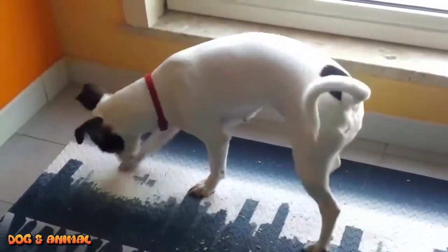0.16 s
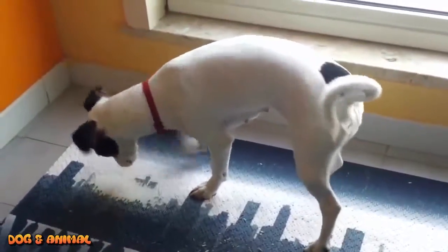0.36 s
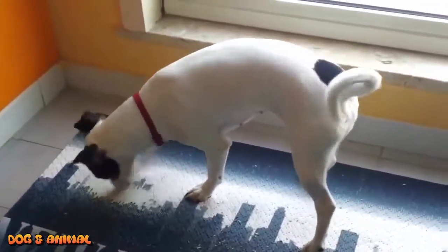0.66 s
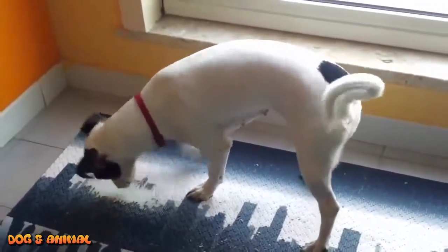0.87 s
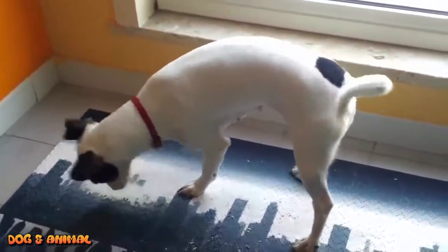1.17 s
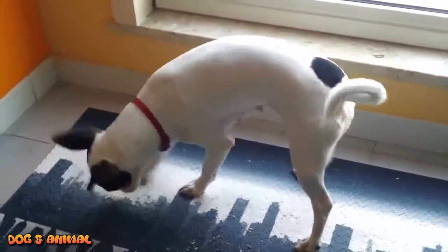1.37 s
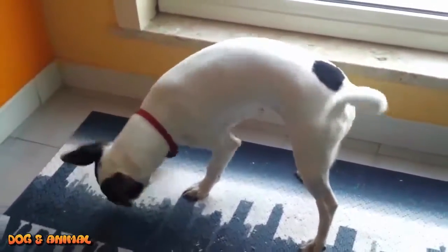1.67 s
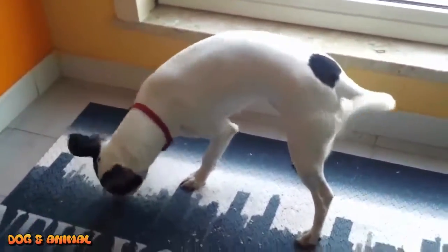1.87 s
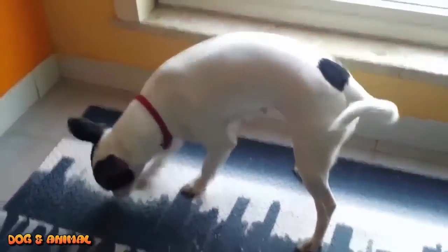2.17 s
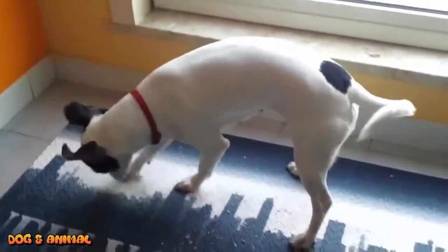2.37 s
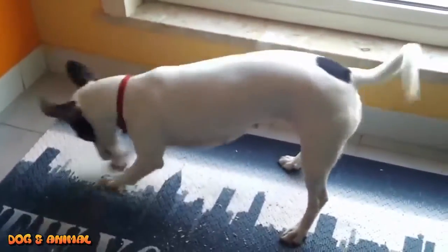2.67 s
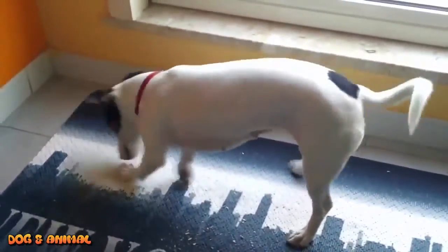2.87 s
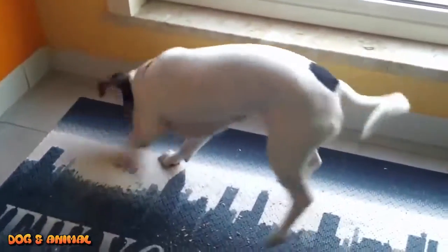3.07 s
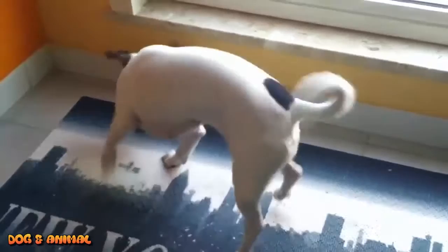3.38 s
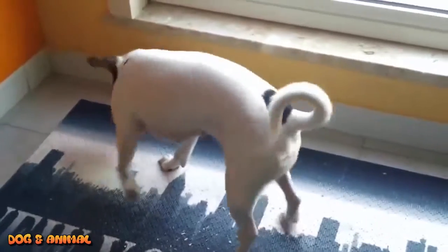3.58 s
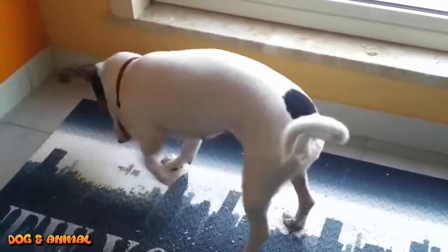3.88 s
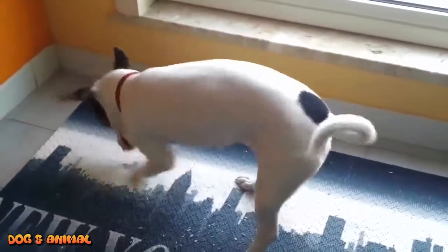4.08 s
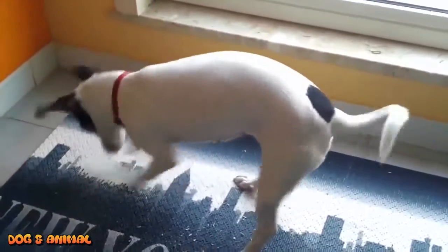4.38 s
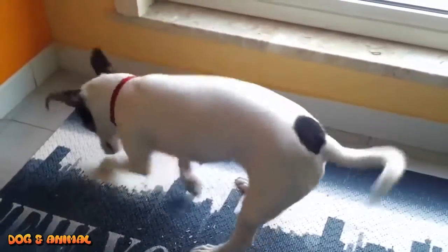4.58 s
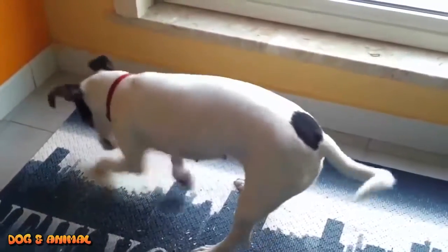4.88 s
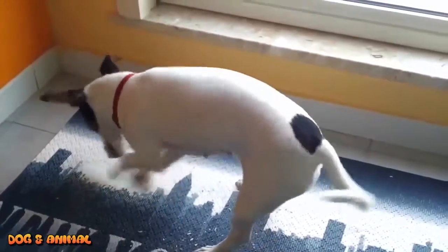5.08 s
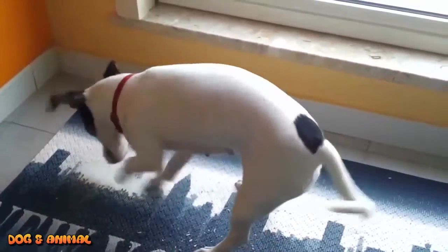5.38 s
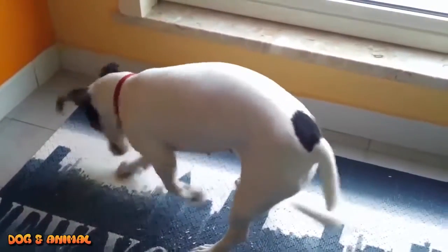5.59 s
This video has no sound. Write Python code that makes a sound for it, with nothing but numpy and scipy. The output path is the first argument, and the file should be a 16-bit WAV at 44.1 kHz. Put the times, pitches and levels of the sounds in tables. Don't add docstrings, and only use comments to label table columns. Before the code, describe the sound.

Claws drag through dense, stiff bristles and tear free with crisp crackling bursts. Strong, regular strokes come first, the mat's rubber underside ringing and slapping the tiles; then a looser patch of ticks, shuffles and one tiny nose whistle; finally both paws scrabble quickly. A phone at two metres hears it in a small, hard, lively room, with thinned quiet detail and little deep bass.

```python
import sys
import numpy as np
from scipy import signal
from scipy.fft import rfft, irfft
from scipy.io import wavfile
from scipy.ndimage import uniform_filter1d

SR = 44100
rng = np.random.default_rng(int(sys.argv[2]) if len(sys.argv) > 2 else 0)


def digitize_waveform(pressure):
    field = np.atleast_2d(pressure).T
    bounded = np.clip(field, -1, 1)
    quanta = np.round(bounded * 32767).astype(np.int16)
    wavfile.write(sys.argv[1], SR, quanta)


def voltage_ratio(level):
    return 10 ** (np.asarray(level, float) / 20)


N = 253218
T = np.arange(N) / SR

# (frequency [Hz], density [dB per Hz])
BRISTLE_TONE = [(1470, -27.5), (2500, -14), (3110, -10.5), (4100, -9.5), (5290, -0.5), (5790, 0),
                (6330, -3.5), (7580, 0.5), (10100, -16), (11200, -16), (12800, -18.5), (13900, -18),
                (15000, -19)]
# (lift time [s], drag length [s], touch level [dB], lift level [dB], backing level [dB])
PAWS_IN_TURN = [(4.438, 0.065, -40, -25, -34.5), (4.564, 0.074, -27, -28, -47),
                (4.714, 0.083, -30, -27, -47.5), (4.788, 0.021, -32, -27.5, -41.5),
                (4.853, 0.024, -30, -31, -44.5), (4.998, 0.074, -29.5, -30.5, -49),
                (5.098, 0.051, -42, -30, -43.5), (5.143, 0.043, -36, -35.5, -46),
                (5.283, 0.091, -31, -30, -47.5), (5.381, 0.048, -35, -29.5, -43.5),
                (5.43, 0.021, -38, -40.5, -49), (5.56, 0.071, -28, -33.5, -60.5),
                (5.595, 0.025, -33, -46.5, -55.5), (5.714, 0.078, -28.5, -31, -46)]


def unit(x):
    return x / np.sqrt(np.mean(x ** 2))


def colour(table, size=1024):
    hz, db = np.transpose(table)
    f = np.maximum(np.arange(size + 1) * SR / 2 / size, 1)
    gain_db = np.interp(np.log(f), np.log(hz), db, left=db[0] - 20, right=db[-1] - 20)
    cepstrum = irfft(np.log(voltage_ratio(gain_db)))
    cepstrum[1:size] *= 2
    cepstrum[size + 1:] = 0
    h = irfft(np.exp(rfft(cepstrum)))[:size]
    return h / np.sqrt(np.sum(h ** 2))


def through(x, h):
    return signal.fftconvolve(x, h)[:N]


def ring(x, hz, width):
    return signal.lfilter(*signal.iirpeak(hz, hz / max(width, 10), SR), x)


def flicks(rate, spread_db):
    luck = rng.random(N)
    sign = rng.choice([-1, 1], N)
    size_db = spread_db * np.minimum(rng.exponential(size=N), 5.5)
    return unit((luck < rate / SR) * sign * voltage_ratio(size_db))


def shape(start_s, end_s, start_db, end_db, rise, fall):
    level_db = np.interp(T, [start_s, end_s], [start_db, end_db])
    return level_db - rise * np.maximum(start_s - T, 0) - fall * np.maximum(T - end_s, 0)


def room(x, wet_db, gap_s):
    # (frequency [Hz], decay time to -60 dB [s])
    decay_times = [(250, 0.83), (1000, 0.16), (2700, 0.31), (7000, 0.31), (14000, 0.84)]
    t = np.arange(SR // 2) / SR
    hz, t60 = np.transpose(decay_times)
    f = np.arange(len(t) // 2 + 1) * SR / len(t)
    noise = rfft(rng.standard_normal(len(t)))
    tail = 0
    for k in range(len(hz)):
        share = np.interp(np.log(f + 1), np.log(hz), np.arange(len(hz)) == k)
        tail = tail + irfft(noise * share, len(t)) * voltage_ratio(-60 * t / t60[k])
    tail = tail * np.clip(t / gap_s, 0, 1) ** 2
    return x + voltage_ratio(wet_db) * through(x, tail / np.sqrt(np.sum(tail ** 2)))


def air():
    # (frequency [Hz], density [dB per Hz])
    air_tone = [(25, -8.5), (100, -6.5), (220, -2), (500, -3.5), (1400, -7), (2500, -12.5), (6000, -4),
                (9500, -24), (15500, -29)]
    return voltage_ratio(-55.5) * through(rng.standard_normal(N), colour(air_tone, size=4096))


def whistle():
    # (time [s], frequency [Hz], level [dB])
    glide = [
        (3.17, 9400, -80),
        (3.2, 9900, -57),
        (3.24, 10500, -67),
        (3.28, 10500, -73),
        (3.36, 11100, -80),
    ]
    s, pitch, level = np.transpose(glide)
    hz = np.interp(T, s, pitch)
    db = np.interp(T, s, level)
    return voltage_ratio(db) * (T > s[0]) * (T < s[-1]) * np.sin(2 * np.pi * np.cumsum(hz) / SR)


def paws():
    # (time [s], held [s], thud level [dB], shuffle level [dB])
    steps = [(.13, 0.016, -61.5, -58), (0.402, 0.051, -46.5, -52), (.715, 0.012, -42, -46.5),
             (0.992, 0.034, -45, -47.5), (1.271, 0.039, -44, -46.5), (1.53, 0.024, -51, -80),
             (1.811, 0.047, -50, -50.5), (2.085, 0.019, -50.5, -50), (2.367, 0.036, -47.5, -49.5),
             (2.679, 0.013, -46.5, -44), (2.94, 0.089, -52.5, -64), (3.11, 0.06, -54, -55.5),
             (3.39, 0.015, -52, -50.5), (3.671, 0.043, -46.5, -49.5), (3.901, 0.078, -47, -54.5),
             (4.19, 0.064, -48, -55), (4.419, 0.013, -49.5, -49.5), (4.56, 0.014, -54.5, -55),
             (4.641, 0.05, -51, -72), (4.77, 0.038, -60, -102), (4.89, 0.082, -58, -73),
             (4.996, 0.015, -64, -55.5), (5.1, 0.18, -60.5, -68), (5.241, 0.021, -55.5, -76),
             (5.341, 0.1, -59, -69.5), (5.55, 0.02, -51.5, -57), (5.679, 0.034, -48.5, -51.5)]
    # (frequency [Hz], density [dB per Hz])
    thud_tone = [(76, -24.5), (130, -13), (210, -2), (247, -8), (280, -0.5), (373, -2), (420, -12.5),
                 (500, -30), (650, -58), (1100, -120)]
    # (frequency [Hz], width [Hz], level [dB])
    floor_notes = [(223, 13.6, 1.5), (276.3, 19.4, -2)]
    land, thud_fall, shuffle_fall = 530, 301, 594
    weight, slide = voltage_ratio(-72), 0
    for s, held, thud_db, shuffle_db in steps:
        weight = weight + voltage_ratio(shape(s, s + held, thud_db, thud_db, land, thud_fall))
        slide = slide + voltage_ratio(shape(s, s + held, shuffle_db, shuffle_db, land, shuffle_fall))
    thud = through(flicks(3000, 1.0), colour(thud_tone, size=4096))
    thud = unit(1.2 * thud + sum(voltage_ratio(db) * ring(thud, hz, w) for hz, w, db in floor_notes))
    shuffle = unit(ring(ring(flicks(3000, 0.43), 682, 217), 573, 240))
    return weight * thud + slide * shuffle


def slaps():
    # (time [s], peak level [dB], frequency [Hz])
    slap_hits = [(0.4286, -42, 2880), (0.726, -32, 2690), (1.015, -25.5, 2630), (1.2948, -21.5, 2676),
                 (1.5741, -21, 2603), (1.8467, -26, 2636), (2.1116, -28, 3010), (2.395, -21.5, 2543),
                 (2.7032, -29.5, 2900), (4.2534, -30.5, 2460), (4.7072, -36, 3230), (5.5736, -26.5, 2420),
                 (5.6996, -27, 2140)]
    out = np.zeros(N)
    t = np.arange(4096) / SR
    for s, peak_db, hz in slap_hits:
        push = rng.standard_normal(len(t)) * np.exp(-t / 0.011)
        note = ring(push, hz, 190)
        i = int(s * SR)
        out[i:i + len(t)] += (voltage_ratio(peak_db + 1.5) * note / np.max(abs(note)))[:N - i]
    return out


def backing(x):
    # (frequency [Hz], density [dB per Hz])
    sheet_tone = [(470, -64), (800, -1), (1280, 4.5), (2060, -0.5), (2640, -1.5), (2900, -6.5), (3730, -4),
                  (4190, -8.5), (4500, 3.5), (5850, -64.5), (9900, -120)]
    # (frequency [Hz], width [Hz], level [dB])
    sheet_modes = [(1403, 60, -13), (1710, 178, 5), (1908, 6.3, -57), (2620, 6.6, -48), (2630, 79, -4),
                   (3015, 21.7, 15), (3576, 305, 3)]
    kick = np.arange(4096) == 0
    modes = 0
    for k, (hz, width, db) in enumerate(sheet_modes):
        modes = modes + (-1) ** k * voltage_ratio(db) * ring(kick, hz, 1.7 * width)
    h = np.convolve(kick + voltage_ratio(2.5) * modes, colour(sheet_tone))
    return through(x, h / np.sqrt(np.sum(h ** 2)))


def drags():
    # (lift time [s], drag length [s], touch level [dB], lift level [dB], backing level [dB])
    single_paw = [(0.046, 0.043, -44, -39, -85), (0.134, 0.05, -40, -30, -43),
                  (.42, 0.058, -48.5, -33, -35), (0.458, 0.036, -28.5, -24, -34.5),
                  (0.733, 0.059, -31.5, -24, -32), (1.018, 0.087, -47.5, -29, -31.5),
                  (1.293, 0.073, -45.5, -27.5, -31), (1.574, 0.081, -47.5, -29.5, -34.5),
                  (1.843, 0.054, -40, -25, -30.5), (2.103, 0.07, -49.5, -26, -30.5),
                  (2.36, .06, -40.5, -36, -73), (2.395, 0.027, -34, -31.5, -44),
                  (2.655, 0.071, -42, -36, -56), (2.71, 0.016, -22.5, -36.5, -53),
                  (2.871, 0.08, -45, -43, -53), (3.062, 0.15, -31.5, -34, -54),
                  (3.153, 0.063, -37.5, -30, -40), (3.36, 0.039, -45.5, -48.5, -55.5),
                  (3.445, 0.066, -32.5, -31.5, -43.5), (3.62, 0.039, -45.5, -62, -77),
                  (3.708, 0.085, -40, -26.5, -35.5), (3.987, 0.11, -41.5, -26, -35.5),
                  (4.285, .11, -32.5, -30, -43.5)]
    land, lift, settle, sheet_fall = 913, 688, 137, 712
    late_s = 0.002
    pile, sheet = 0, 0
    for s, drag, touch_db, lift_db, back_db in single_paw + PAWS_IN_TURN:
        start = s - max(drag, .005)
        pile = pile + voltage_ratio(2 * shape(start, s, touch_db, lift_db, land, lift))
        settle_db = lift_db - 18
        pile = pile + voltage_ratio(2 * shape(s, s + .001, settle_db, settle_db, land, settle))
        low_db = back_db + 1.435 * (touch_db - lift_db)
        sheet = sheet + voltage_ratio(2 * shape(start + late_s, s + late_s, low_db, back_db, land, sheet_fall))
    return np.sqrt(pile), np.sqrt(sheet)


def grit():
    k = int(SR / 109.24)
    steps_db = np.repeat(rng.standard_normal(N // 100), k)[:N]
    return voltage_ratio(2 * unit(uniform_filter1d(steps_db, k)))


def scrape(pile):
    return through(pile * grit() * flicks(9000, 1.4), colour(BRISTLE_TONE))


def releases():
    # (time [s], peak [dB], backing over peak [dB], frequency [Hz])
    tears = [(.1186, -16.5, -15, 6260), (.4266, -18, -4, 5900), (.7117, -9.5, -10, 5240),
             (1.0034, -7.5, -20, 5080), (1.2805, -10.5, -8, 5200), (1.5603, -11, -19, 5030),
             (1.8341, -12.5, -15, 6900), (2.096, -14.5, -45, 6500), (2.3809, -11, -6.5, 5200),
             (2.691, -14, -5, 5460), (3.1477, -19.5, -44, 6300), (3.4325, -13.5, -33, 4850),
             (3.704, -13.5, -31, 5930), (3.9759, -10, -27, 6200), (4.2676, -13.5, -43, 8250),
             (4.4251, -16, -26, 5170), (4.5532, -20, -7.5, 5570), (4.6997, -15.5, -12.5, 6550),
             (4.8344, -17, -26, 6100), (4.9833, -19, -34, 6440), (5.1297, -18, -27, 5900),
             (5.2677, -17.5, -10, 6000), (5.4179, -19, -14, 5950), (5.5633, -25, -2, 5960),
             (5.696, -17, -6, 5300)]
    # (time [s], peak [dB], backing over peak [dB])
    slips = [(0.6839, -23.5, -2), (0.9823, -22, 1.5), (0.9952, -17, -3), (1.266, -20.5, 1),
             (1.548, -20, -0.5), (1.819, -22.5, 2), (2.0811, -28, 2.5), (2.369, -19, -5),
             (2.373, -17.5, 1.5), (3.3928, -23, -12), (3.4058, -25, -28), (3.4398, -20, -15),
             (3.898, -22.5, -9)]
    # (time [s], peak [dB])
    touches = [(0.2937, -43.5), (2.3022, -32.5), (2.9053, -54), (3.6452, -29), (4.1747, -35), (4.3852, -25),
               (4.487, -29), (4.6159, -26.5), (4.7638, -23), (4.917, -26), (5.0648, -24), (5.2019, -27),
               (5.3445, -25.5), (5.4864, -24), (5.6412, -32)]
    # (time [s], peak [dB], frequency [Hz])
    ticks = [(1.8132, -17, 7060), (2.6445, -18.5, 7200), (2.6893, -7.5, 5370), (2.978, -18.5, 5140),
             (3.0093, -19, 5200), (3.051, -27, 6600), (3.3224, -29.5, 5560), (3.3834, -18, 6760),
             (3.5796, -25, 4770), (3.84, -28, 3600), (4.074, -40, 6000), (5.421, -21.5, 6100),
             (5.6965, -15.5, 5370)]

    def scatter(hz):
        return hz + 750 * (2 * rng.random() - 1)

    rows = []
    for s, db, back_db, hz in tears:
        ms, soft = (3.5, 1.7) if s > PAWS_IN_TURN[0][0] else (2.7, 1.15)
        rows.append((s, db, back_db, ms, hz, soft))
    rows += [(s, db, back_db, 2.9, scatter(6230), 1.15) for s, db, back_db in slips]
    rows += [(s, db, -12, 5.5, scatter(5930), 1.8) for s, db in touches]
    rows += [(s, db, -17, 1.1, hz, .15) for s, db, hz in ticks]
    return rows


def snaps():
    bright, knock = np.zeros(N), np.zeros(N)
    length = 2048
    ms_in = np.arange(length) * 1000 / SR
    for s, peak_db, back_db, ms, hz, soft in releases():
        swell = np.clip(soft, 0, 2)
        i = int((s - .0004 * ms * swell) * SR)
        size_db = 3 * np.minimum(rng.exponential(size=length), 3)
        rattle = rng.standard_normal(length) * voltage_ratio(size_db) * (rng.random(length) < .3)
        u = ms_in / np.clip(1.22 * ms, .2, 12)
        burst = (rattle * u ** swell * np.exp(-u))[:N - i]
        burst = burst / np.max(abs(burst))
        bright[i:i + length] += voltage_ratio(peak_db + 1.5) * (0.48 * burst + 1.25 * ring(burst, hz, 1500))
        slow = ms_in / 6
        knock[i:i + length] += voltage_ratio(peak_db + back_db - 1) * (rattle * slow * np.exp(-slow))[:N - i]
    return through(bright, colour(BRISTLE_TONE)), knock


def scene():
    bright, knock = snaps()
    pile, sheet = drags()
    bristles = voltage_ratio(-6) * scrape(pile) + bright
    rub = backing(voltage_ratio(-2) * sheet * flicks(4000, 0.98) + knock)
    mat = room(bristles, wet_db=-3, gap_s=0.0019) + room(rub + slaps(), wet_db=1.5, gap_s=0.0029)
    return (mat + paws() + whistle() + air())[None]


def thin_bands(x):
    # (frequency [Hz], margin [dB])
    keep_margins = [(40, 9), (120, 15.5), (300, 16), (480, 14), (750, 17), (1200, 17), (2500, 16.5),
                    (4000, 20.5), (9500, 24), (10400, 34), (11500, 24.5), (13000, 49), (15500, 49)]
    # (from [s], to [s])
    open_spans = [(.04, .11), (.22, .46), (1.21, 1.32), (1.78, 1.88), (2.3, 2.37), (2.56, 2.73), (2.9, 3.1),
                  (3.27, 3.44), (3.5, 3.78), (3.88, 4.02), (4.14, 4.4), (4.47, 4.55), (4.6, 4.78),
                  (4.87, 5.1), (5.18, 5.33), (5.38, 5.46), (5.5, 5.57), (5.62, 5.74)]
    depth_db, luck_db = -45, 3
    size = 2048
    window = signal.windows.cosine(size)
    f, frame_s, z = signal.stft(x, SR, window, size, size // 2)
    band = np.floor(np.where(f < 1000, f / 86, 11.6 + 14 * np.log(np.maximum(f, 1) / 1000))).astype(int)
    member = band == np.unique(band)[:, None]
    count = member.sum(1)
    centre = member @ f / count
    level_db = 10 * np.log10(member @ abs(z) ** 2 / count[:, None] + 1e-18)
    loudest = level_db.max(0)
    hz, margin_db = np.transpose(keep_margins)
    margin = np.interp(np.log(centre + 1), np.log(hz), margin_db)[:, None]
    recent_db = 20 * np.log10(signal.lfilter([.25], [1, -.75], voltage_ratio(loudest)))
    top = (centre > 9500)[:, None]
    debt = top * (1.52 * np.maximum(recent_db - loudest, -4) + 0.83 * rng.standard_normal(len(loudest)))
    low = (centre < 2600)[:, None]
    debt = debt + low * 0.67 * np.clip(loudest - recent_db, -12, 8)
    is_open = sum((frame_s > a) & (frame_s < b) for a, b in open_spans)
    passed = is_open * (rng.random(level_db.shape) > .5)
    shut = 60 * (centre > 12000)[:, None] * (1 - passed)
    spare = level_db - loudest - debt - shut + margin + luck_db * rng.standard_normal(level_db.shape)
    gain = voltage_ratio(depth_db / (1 + np.exp(np.clip(spare, -30, 30))))
    return signal.istft(z * (member.T @ gain), SR, window, size, size // 2)[1][:N]


def roll_off(x):
    return signal.sosfilt(signal.butter(12, 16010, fs=SR, output="sos"), x)


def record(dry):
    x = signal.sosfilt(signal.butter(1, 25, "high", fs=SR, output="sos"), dry)
    mix = thin_bands(x[0])[None]
    return roll_off(mix)


dry = scene()
out = record(dry)
digitize_waveform(out)
```